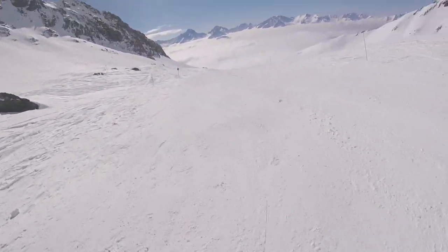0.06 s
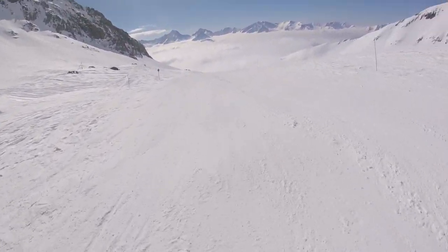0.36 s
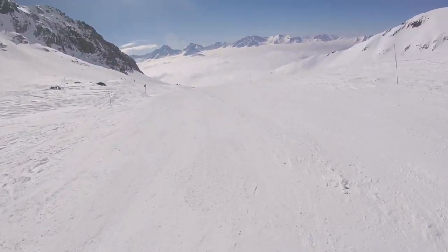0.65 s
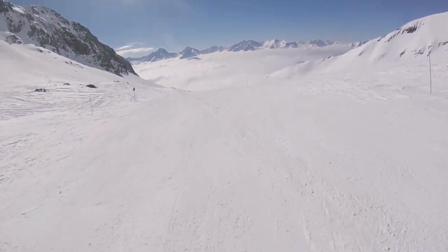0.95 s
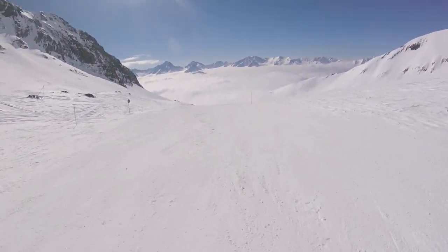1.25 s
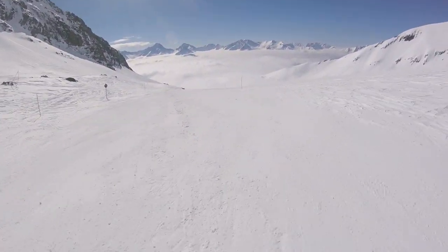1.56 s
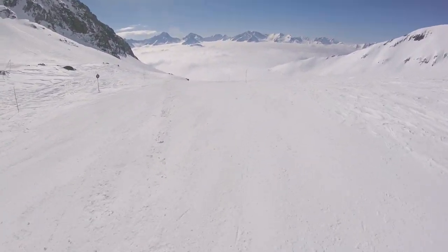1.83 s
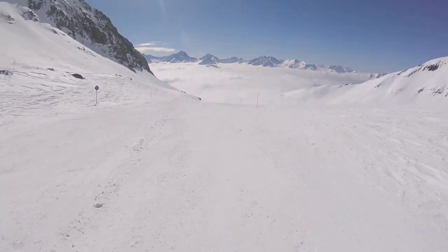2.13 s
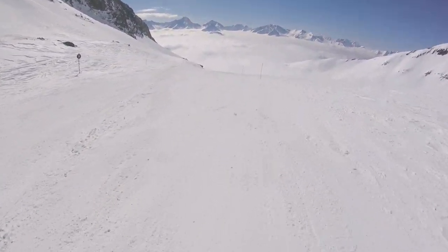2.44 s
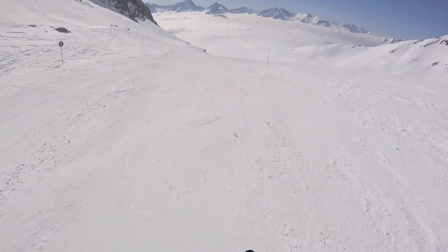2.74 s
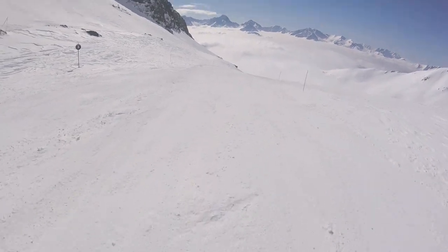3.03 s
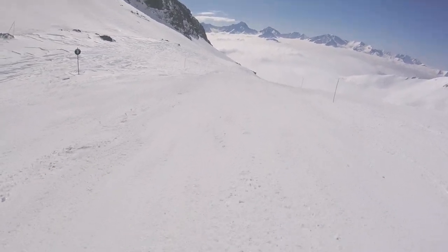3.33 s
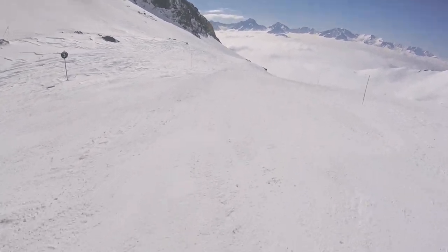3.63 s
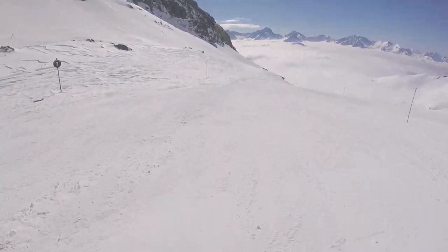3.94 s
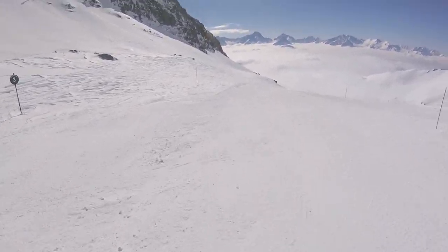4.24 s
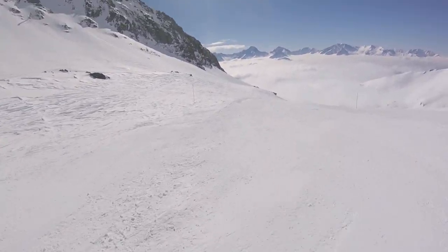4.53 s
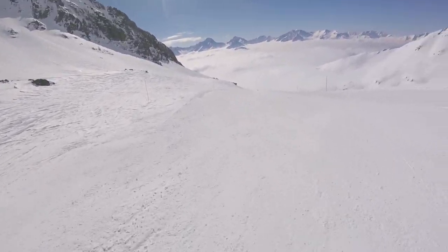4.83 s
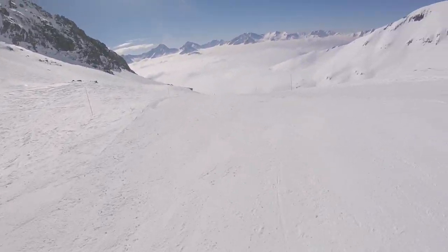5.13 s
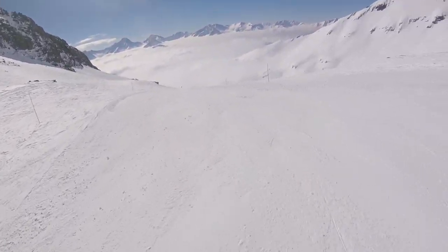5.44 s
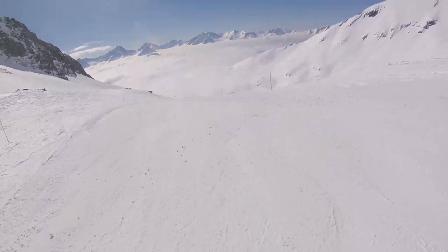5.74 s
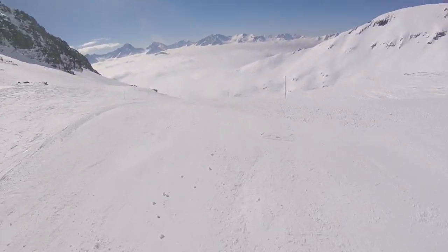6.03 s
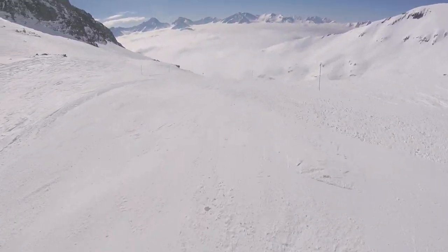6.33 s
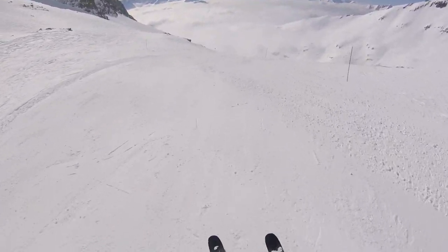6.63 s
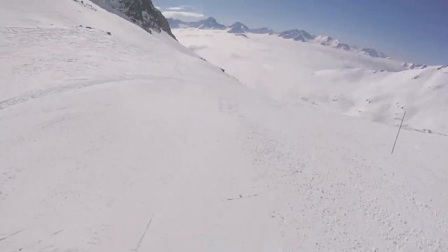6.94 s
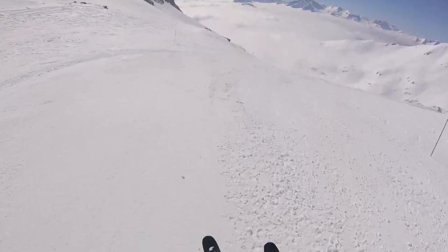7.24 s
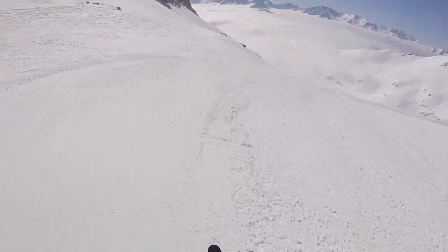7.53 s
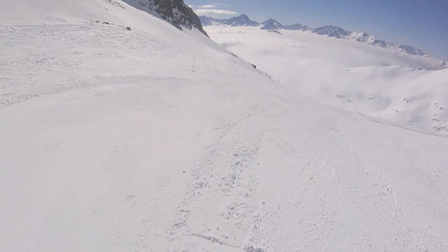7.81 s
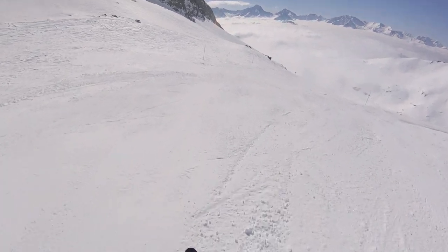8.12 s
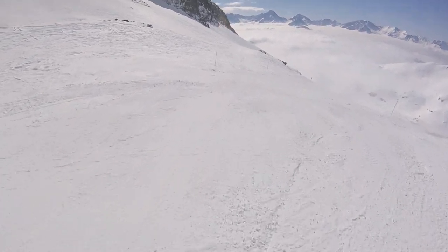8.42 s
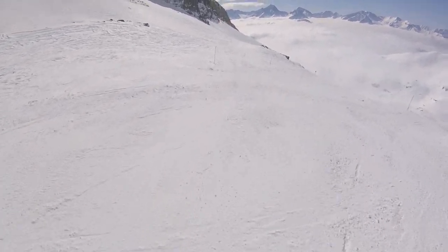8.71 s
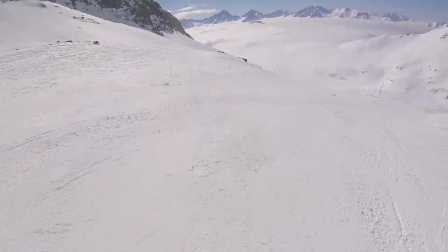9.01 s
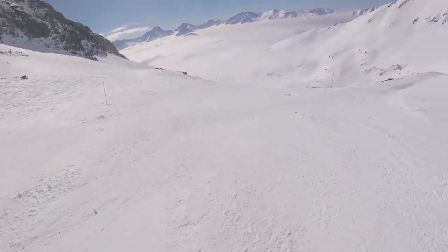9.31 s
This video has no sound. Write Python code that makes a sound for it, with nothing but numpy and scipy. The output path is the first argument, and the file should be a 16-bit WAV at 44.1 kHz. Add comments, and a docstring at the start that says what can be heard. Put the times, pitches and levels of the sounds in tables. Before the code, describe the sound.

Skis scrape and hiss fast over hard-packed snow, with clumps clacking against them and gusty wind buffeting the microphone.

```python
"""Fast ski descent on hard-packed snow

Out on the open slope, from a camera worn by the skier, with the skis just below.
Steel edges scrape and chatter through the turns, spray hisses, and hard clumps clack against the skis.
Right at the microphone the headwind rumbles and buffets, whistling briefly where it is strongest."""
import sys
import numpy as np
from scipy import signal
from scipy.fft import rfft, irfft, next_fast_len
from scipy.io import wavfile
from scipy.ndimage import map_coordinates

SR = 44100
rng = np.random.default_rng(int(sys.argv[2]) if len(sys.argv) > 2 else 0)


def int16_out(signal):
    """Quantize to a 16-bit WAV file."""
    q = np.round(np.clip(np.atleast_2d(signal).T, -1, 1) * 32767)
    wavfile.write(sys.argv[1], SR, q.astype(np.int16))


N = 413216

# Long turns. Each row: time of full pressure, rise, hold and release in seconds, scrape and spray in dB.
TURNS = [(0, .05, 1.84, 0.34, -41, -47), (2.37, 0.32, 1.72, 0.14, -36.5, -43),
         (4.98, 0.89, 0.68, 1, -33.5, -38), (7.2, 0.8, 1.93, 0.17, -38.5, -39)]
# The tails slip sideways. Each row: time of full slip, rise, hold and release in seconds,
# scrape and spray in dB.
SKIDS = [(0.006, 0.17, 0.48, 0.3, -39, -40.5), (0.868, 0.031, 0.028, 0.23, -38, -43),
         (1.116, 0.072, 0.16, 0.29, -40.5, -63), (1.488, 0.59, .03, 0.49, -36, -41),
         (2.198, 0.22, 0.095, 0.11, -35, -46), (2.337, 0.055, 0.055, 0.37, -27, -48),
         (2.396, 0.13, 0.27, 1, -31, -32.5), (3.078, 0.6, 0.059, 0.52, -32.5, -38),
         (3.4, 0.17, 0.35, 0.33, -37, -36), (3.452, 0.32, 0.037, 0.1, -27.5, -33.5),
         (3.575, 0.037, 0.011, 0.022, -28.5, -36), (3.632, .012, 0.024, 0.045, -31.5, -37),
         (3.808, .02, 0.032, 0.07, -32.5, -44), (4.066, 0.04, 0.072, 0.25, -32.5, -43.5),
         (4.61, 0.19, 0.1, 0.11, -39, -44.5), (4.915, 0.069, 0.071, 0.11, -32.5, -39),
         (5.45, 0.62, 0.24, 0.49, -38, -35), (6.52, 0.23, 0.072, 0.31, -38.5, -42),
         (6.727, 0.017, 0.11, .04, -33, -36), (6.96, 0.061, 0.013, 0.23, -32, -37),
         (7.19, 0.05, 0.04, 0.55, -33, -33), (8.385, 0.57, 0.29, 0.13, -63, -40),
         (8.944, 0.33, 0.21, 0.1, -52, -43), (9.144, 0.11, 0.021, 0.47, -36, -53)]
# The skis go light between edges. Each row: time and hold in seconds, loss in dB.
EDGE_CHANGES = [(1.82, 0.12, 5.5), (2.03, 0.061, 8), (4.268, 0.023, 6.5)]
# Hard clumps hit the skis. Each row: start in seconds, level in dB, centre of the clack in Hz,
# seconds for the crumbling to fall 60 dB.
CLUMPS = [(0.455, -24, 1500, .03), (0.524, -21, 1700, 0.018), (0.590, -23, 1140, 0.029),
          (0.947, -23, 1100, 0.027), (1.110, -16.5, 1090, 0.023), (1.136, -22, 1390, .05),
          (1.200, -17.5, 1240, .025), (1.236, -24, 1300, 0.036), (1.471, -16, 1280, 0.037),
          (1.912, -29.5, 1000, 0.035), (1.965, -28.5, 970, 0.067), (2.064, -29, 700, 0.028),
          (2.09, -28, 990, 0.063), (2.125, -25, 890, 0.027), (2.641, -12, 1380, 0.021),
          (2.699, -16.5, 1650, 0.028), (2.731, -15, 1020, 0.028), (2.775, -13.5, 930, 0.043),
          (2.815, -13.5, 1130, .025), (3.322, -14.5, 1600, .02), (3.423, -15, 1300, 0.021),
          (3.45, -17, 1200, .025), (3.483, -14, 1390, .025), (3.51, -16, 2000, .025),
          (3.538, -14.5, 1100, 0.055), (3.581, -15, 950, 0.04), (3.6, -17, 800, 0.0094),
          (3.628, -15, 1130, 0.045), (3.77, -14.5, 1150, .018), (3.805, -21, 1500, .02),
          (4.845, -18.5, 900, 0.057), (4.896, -16.5, 1110, .025), (5.126, -16.5, 1390, .035),
          (5.173, -16.5, 1400, 0.034), (5.494, -15.5, 1250, .025), (6.187, -25, 925, 0.03),
          (6.429, -26, 1450, 0.017), (6.449, -29, 1090, 0.027), (6.754, -21, 1500, .025),
          (6.807, -21, 1500, .025), (6.948, -29, 1400, .012), (7.112, -20, 600, 0.022),
          (8.048, -19, 1320, 0.022), (8.227, -19.5, 800, 0.028), (8.584, -21, 895, 0.027),
          (8.856, -22, 1430, 0.036), (8.889, -19.5, 960, 0.03), (8.974, -19.5, 1010, 0.027),
          (9.022, -24, 800, 0.027), (9.146, -21, 1520, .025)]
# Short bright scrapes of the edges, and two sharp clicks of clumps hitting the skis (the shortest rows).
# Each row: start in seconds, level in dB, length in seconds.
SCRAPES_AND_CLICKS = [(1.463, -39, 0.028), (2.337, -37, .08), (3.333, -28.5, 0.017), (4.299, -41, 0.019),
                      (4.893, -32.5, 0.018), (5.12, -27, 0.017), (5.156, -33, 0.048), (6.729, -31, 0.036),
                      (6.774, -39, 0.068), (6.946, -28, 0.0018), (6.964, -35, 0.016), (7.11, -31, .003)]
# The tone of what happens underfoot. Each row: frequency in Hz, relative level in dB.
SCRAPE_SPECTRUM = [(100, -20.5), (250, -2), (400, 2), (620, 1), (900, -0.5), (1500, 0), (1800, -4.5),
                   (2150, -5.5), (3200, -10.5), (4300, -16.5), (7000, -36), (13000, -45.5)]  # edges on crust
SPRAY_SPECTRUM = [(500, -14), (1500, -21), (3000, -0.5), (4250, -6), (5100, -0.5), (7000, 1.5),
                  (8000, -1.5), (9400, -4), (10000, -9.5), (10700, -25.5), (12500, -22), (14000, -66)]  # thrown snow
KNOCK_SPECTRUM = [(100, -36.5), (400, -7.5), (800, 4), (1400, -1), (2100, -1.5), (2900, -9.5), (4400, -23),
                  (13000, -51)]  # the dull clack of a ski
BRIGHT_SPECTRUM = [(200, -3), (700, -17), (1500, 1), (2900, 1.5), (4300, -7.5), (7000, -1), (9400, -8.5),
                   (10700, -29), (14000, -40)]  # short scrapes and sharp clicks

# Headwind between gusts. Each row: time in seconds, roar in dB, rumble in dB.
STEADY_WIND = [(0, -51, -35.5), (1.0, -34.5, -35), (1.6, -41.5, -36.5), (2.4, -36, -32),
               (3.2, -40.5, -32.5), (3.8, -37, -31), (4.15, -39, -34.5), (4.8, -34, -30.5),
               (5.9, -33.5, -32), (6.35, -39, -33), (7.2, -38, -30.5), (7.45, -43, -37), (8.15, -39.5, -31),
               (8.8, -42, -37), (9.37, -39, -37)]
# Gusts over the camera housing. Each row: time of full strength, rise, hold and release in seconds,
# roar and hollow rush in dB.
GUSTS = [(0.01, 0.2, 0.1, 0.22, -26.5, -29.5), (.17, .15, 0.26, 0.046, -25, -32.5),
         (.49, 0.032, 0.097, 0.27, -27.5, -55), (2.35, 0.34, 0.026, 0.067, -46, -40),
         (4.28, 0.07, 0.077, 0.16, -34.5, -60), (4.43, 0.08, 0.08, 0.24, -34, -58),
         (4.78, 0.26, 0.12, .1, -38, -36.5), (4.96, 0.04, 0.041, 0.08, -26, -35),
         (5.035, .04, 0.096, 0.18, -33, -33.5), (5.17, 0.1, 0.022, 0.035, -25, -32),
         (5.48, 0.12, 0.321, 0.045, -31, -32.5), (5.92, 0.12, 0.085, 0.19, -34, -40),
         (6.57, 0.14, 0.11, 0.18, -35, -46), (6.82, 0.082, 0.081, 0.044, -39, -40),
         (7.1, 0.18, 0.042, 0.073, -30, -37), (7.26, .06, 0.021, .07, -28.5, -40),
         (8.09, 0.06, 0.043, 0.15, -38, -56), (9.17, 0.082, 0.08, 0.18, -35, -53)]
# Big eddies hit the microphone. Each row: midpoint in seconds, level in dB, pitch in Hz.
BUFFETS = [(0.185, -12.5, 199), (0.592, -21, 100), (0.427, -14.5, 55.3), (0.436, -11, 114),
           (1.402, -20, 44.3), (1.52, -27, 55), (2.065, -22, 53.7), (2.316, -24, 55), (2.648, -19.5, 130),
           (2.924, -20, 45), (3.7, -25, 45), (3.83, -23, 38), (4.076, -20.5, 75), (4.225, -21.5, 54),
           (4.292, -23, 110), (4.321, -19.5, 90), (4.478, -20, 115), (4.502, -16, 124), (4.541, -19, 85),
           (4.573, -20, 67), (4.601, -14.5, 58), (4.702, -21, 75), (4.965, -12, 164), (5.039, -13, 85),
           (5.055, -18, 95), (5.072, -14, 70), (5.137, -18, 65), (5.186, -13, 101), (5.651, -14, 89),
           (5.936, -15, 54), (6.527, -20, 70), (6.589, -17.5, 58.4), (6.616, -17.5, 65), (6.999, -11, 37),
           (7.116, -24, 130), (7.166, -20, 70), (7.29, -23, 60), (7.588, -24, 70.5), (7.838, -18.5, 112),
           (8.098, -21, 70), (8.158, -22, 55), (8.256, -24, 85), (8.579, -20, 62), (9.191, -23, 55)]
# Air tears off the housing. Each row: time of full strength, rise, hold and release in seconds,
# level in dB.
RIPS = [(0.076, 0.073, 0.065, .03, -31), (0.429, 0.068, 0.01, .006, -24.5), (5.066, .02, 0.0067, .008, -32),
        (5.17, .02, 0.0065, .008, -33), (5.465, 0.017, 0.0091, .01, -26), (5.647, .03, 0.015, 0.024, -32.5),
        (5.783, 0.021, 0.0064, 0.009, -39)]
# Air whistles over an edge of the gear. Each row: time of full strength, rise, hold and release
# in seconds, level in dB.
WHISTLES = [(5.202, .015, 0.038, 0.018, -30.5), (5.262, .015, 0.072, 0.032, -32),
            (5.38, .025, .035, .015, -32.5), (5.42, .01, 0.012, .01, -32.5)]
# The whistle follows the air speed. Each row: time in seconds, pitch in Hz.
WHISTLE_PITCH = [(5.204, 1293), (5.228, 1557), (5.25, 1344), (5.266, 1446), (5.279, 1287), (5.292, 1460),
                 (5.306, 1350), (5.322, 1516), (5.345, 1440), (5.378, 1353), (5.392, 1424), (5.415, 1340),
                 (5.425, 1554)]
# The tone of the wind, close up. Each row: frequency in Hz, relative level in dB.
RUMBLE_SPECTRUM = [(8, -23), (22, -3.5), (45, 0), (80, -4), (120, -14), (200, -28.5), (500, -56.5),
                   (2000, -120)]  # eddies on the microphone
ROAR_SPECTRUM = [(40, -25), (85, -2.5), (125, 2), (175, -2), (245, -6.5), (310, -12), (600, -26),
                 (1200, -38.5), (4000, -60), (13000, -95)]  # flow round the housing
RUSH_SPECTRUM = [(100, -18.5), (170, -3), (240, 5.5), (350, 7.5), (480, 4), (650, 2.5), (820, -4),
                 (1200, -5.5), (2500, -31), (9000, -66)]  # the hollow note of a gust
TORN_AIR_SPECTRUM = [(80, -27), (220, 1.5), (500, 3), (800, 0), (1250, -5.5), (1700, -11), (2300, -19),
                     (4000, -38), (13000, -59)]  # the throaty rasp of a rip
# Resonances of the microphone cavity. Each row: centre in Hz, width in Hz, boost in dB.
MIC_CAVITY = [(5430, 1010, 8.5), (6503, 330, 9.5)]


def skis(glide_scrape_db=-47.5, glide_spray_db=-47):
    """Edges grind through crust and throw spray; ski chatter shakes both, and lumps rattle on the skis."""
    edge_db, hiss_db = surges(TURNS + SKIDS, glide_scrape_db, glide_spray_db)
    lift_db = sum(db * swell(s, 0.13, hold, 0.036) for s, hold, db in EDGE_CHANGES)
    ground_db = 0.12 * wobble(28) - lift_db
    edge_db, hiss_db = edge_db + ground_db, hiss_db + ground_db
    chatter_db = 0.43 * wobble(40) + 0.93 * wobble(150)
    crunch = impulses(rate=2600, spread_db=6.5)
    grind = coloured(0.66 * crunch + rng.standard_normal(N), SCRAPE_SPECTRUM)
    grains = 0.47 * crunch + 0.43 * impulses(rate=1400, spread_db=9.0)
    powder = coloured(grains + rng.standard_normal(N), SPRAY_SPECTRUM, MIC_CAVITY)
    scrape = amp(edge_db - 0.5) * unit(grind * amp(1.6 * chatter_db + 0.96 * wobble(30)))
    spray = amp(hiss_db) * unit(powder * amp(1.23 * chatter_db + 0.87 * wobble(35)))
    lumps = amp(edge_db - 5.0) * coloured(rattle(rate=150, t60=0.037, spread_db=1.5), KNOCK_SPECTRUM)
    return scrape + spray + lumps


def rattle(rate, t60, spread_db):
    """Small lumps of crust strike at random moments, each a short gritty burst; rms 1."""
    t = np.arange(SR // 10) / SR
    decay = amp(-60 * t / t60)
    energy = signal.fftconvolve(impulses(rate, spread_db) ** 2, decay ** 2)[:N]
    return unit(np.sqrt(np.abs(energy)) * rng.standard_normal(N))


def clumps(q=0.88, clack_db=-1.5, crumble_db=-7.5, crackle_db=-22, rise_s=0.00025):
    """Each clump clacks on a ski, duller or sharper by its size, then crumbles with a bright crackle."""
    knocks, crackle = np.zeros((2, N))
    t = np.arange(SR // 10) / SR
    for s, db, hz, t60 in CLUMPS:
        band = signal.iirpeak(hz, q, SR)
        strike_and_noise = [t == 0, rng.standard_normal(len(t))]
        clack, grit = signal.lfilter(*band, signal.lfilter(*band, strike_and_noise))
        contact = amp(clack_db) * clack / np.abs(clack).max()
        crumbling = amp(-60 * t / t60) * (1 - np.exp(-t / rise_s))
        add(knocks, s, amp(db) * (contact + amp(crumble_db) * crumbling * unit(grit)))
        add(crackle, s, amp(db + crackle_db) * crumbling * rng.standard_normal(len(t)))
    return knocks + coloured(crackle, SPRAY_SPECTRUM, MIC_CAVITY)


def scrapes_and_clicks(ramp_s=0.0039):
    """An edge scrapes briefly or a clump clicks on a ski: bright grit that starts and stops abruptly."""
    strength = np.zeros(N)
    t = np.arange(SR // 10) / SR
    for s, db, length in SCRAPES_AND_CLICKS:
        gate = np.clip(np.minimum(t, length - t + ramp_s) / ramp_s, 0, 1)
        add(strength, s, amp(db) * gate)
    return strength * coloured(impulses(rate=5000, spread_db=1.0), BRIGHT_SPECTRUM, MIC_CAVITY)


def headwind(steady_rush_db=-6.5, rumble_growth=0.17):
    """Eddies thump at the microphone; faster flow breaks into a fluttering roar and a hollow rush."""
    steady_roar_db, steady_rumble_db = curves(STEADY_WIND)
    roar_db, rush_db = surges(GUSTS, steady_roar_db, steady_roar_db + steady_rush_db)
    rumble_db = steady_rumble_db + rumble_growth * (roar_db - steady_roar_db)
    puff_db = 0.71 * wobble(14)  # moves rumble and roar together
    eddies = 1.08 * impulses(rate=110, spread_db=2.0) + rng.standard_normal(N)
    rumble = unit(coloured(eddies, RUMBLE_SPECTRUM) * amp(puff_db + 0.41 * wobble(4.2) + wobble(45)))
    flow = 0.73 * impulses(rate=130, spread_db=3.0) + rng.standard_normal(N)
    roar = unit(coloured(flow, ROAR_SPECTRUM) * amp(puff_db + 0.82 * wobble(30) + 2.3 * wobble(170)))
    rush = unit(coloured(rng.standard_normal(N), RUSH_SPECTRUM) * amp(3.0 * wobble(200)))
    return amp(rumble_db) * rumble + amp(roar_db) * roar + amp(rush_db) * rush


def buffets(width_cycles=0.38, tear_db=-17):
    """An eddy passing the microphone gives a short swing of pressure with torn air inside it."""
    swing, tear = np.zeros((2, N))
    t = np.arange(-SR // 10, SR // 10) / SR
    for s, db, hz in BUFFETS:
        push = amp(db) * np.exp(-0.5 * (t * hz / width_cycles) ** 2)
        add(swing, s + t[0], push * np.cos(2 * np.pi * (hz * t + rng.random())))
        add(tear, s + t[0], push * rng.standard_normal(len(t)))
    return swing + amp(tear_db) * coloured(tear, ROAR_SPECTRUM)


def rips(flutter_db=1.0):
    """At a gust's crest the flow tears off the housing: a fluttering rasp that builds and stops dead."""
    strength = sum(amp(db) * swell(*timing) for *timing, db in RIPS)
    torn_air = coloured(rng.standard_normal(N), TORN_AIR_SPECTRUM)
    return strength * unit(torn_air * amp(flutter_db * wobble(300)))


def whistle(jitter=0.03, flutter_db=1.5):
    """Vortices shed from an edge of the gear give an unsteady, raspy tone in short spurts."""
    hz, = curves(WHISTLE_PITCH)
    blowing = sum(amp(db) * swell(*timing) for *timing, db in WHISTLES)
    phase = 2 * np.pi * np.cumsum(hz * (1 + jitter * wobble(700))) / SR
    return blowing * amp(flutter_db * wobble(280)) * np.sqrt(2) * np.sin(phase)


def swell(s, rise, hold, release, span_db=20):
    """Gain that reaches 1 at time s, holds and dies away, moving span_db over each rise or release."""
    t = np.arange(N) / SR - s
    outside = np.maximum(-t / rise, 0) + np.maximum((t - hold) / release, 0)
    return amp(-span_db * np.minimum(outside, 10))


def surges(rows, *steady_db):
    """Level in dB of each layer: its steady part plus the power of every swell."""
    shapes = np.array([swell(*row[:4]) for row in rows])
    gains = amp(np.array(rows)[:, 4:].T)
    powers = gains ** 2 @ shapes ** 2
    return [10 * np.log10(power + amp(db) ** 2) for power, db in zip(powers, steady_db)]


def impulses(rate, spread_db):
    """Kicks of varying force at random moments, about rate a second; rms 1."""
    chance, force, sign = rng.random(N), rng.standard_normal(N), rng.choice([-1, 1], N)
    return unit((chance < rate / SR) * sign * amp(spread_db * np.minimum(force, np.pi)))


def coloured(x, spectrum, peaks=()):
    """Pass x through a causal filter of energy 1, drawn from a spectrum and resonance peaks."""
    size = 2 * next_fast_len(N // 2 + SR // 4)
    hz = np.fft.rfftfreq(size, 1 / SR)
    points_hz, points_db = np.transpose(spectrum)
    db = np.interp(np.log(hz + 1), np.log(points_hz), points_db)
    db += sum(boost / (1 + (2 * (hz - centre) / width) ** 2) for centre, width, boost in peaks)
    # Minimum phase, so nothing rings ahead of a strike.
    cepstrum = irfft(np.log(unit(amp(db))))
    cepstrum[1:size // 2] *= 2
    cepstrum[size // 2 + 1:] = 0
    return irfft(rfft(x, size) * np.exp(rfft(cepstrum)))[:N]


def wobble(rate):
    """A smooth random curve, rate knots a second."""
    knots = rng.standard_normal(int(N * rate / SR) + 4)
    return map_coordinates(knots, [np.arange(N) * rate / SR])


def curves(rows):
    """One value per sample for each column after the time."""
    times, *columns = np.transpose(rows)
    return [np.interp(np.arange(N) / SR, times, column) for column in columns]


def add(track, s, sound):
    """Mix a sound into a track from time s."""
    part = track[max(round(s * SR), 0):][:len(sound)]
    part += sound[:len(part)]


def amp(db):
    """Decibels to gain."""
    return 10 ** (np.asarray(db) / 20)


def unit(x):
    """Scale to rms 1."""
    return x / np.sqrt(np.mean(x ** 2) + 1e-20)


def scene():
    """Skis below, wind at the microphone, open air all round; mono."""
    return (skis() + clumps() + scrapes_and_clicks() + headwind() + buffets() + rips() + whistle())[None]


def record(dry):
    """The body-worn camera keeps nothing above its band limit."""
    top_hz = 13400
    size = next_fast_len(N + SR // 2)
    passband = np.fft.rfftfreq(size, 1 / SR) < top_hz
    return irfft(rfft(dry, size) * passband, size)[:, :N]


dry = scene()
out = record(dry)
int16_out(out)
```